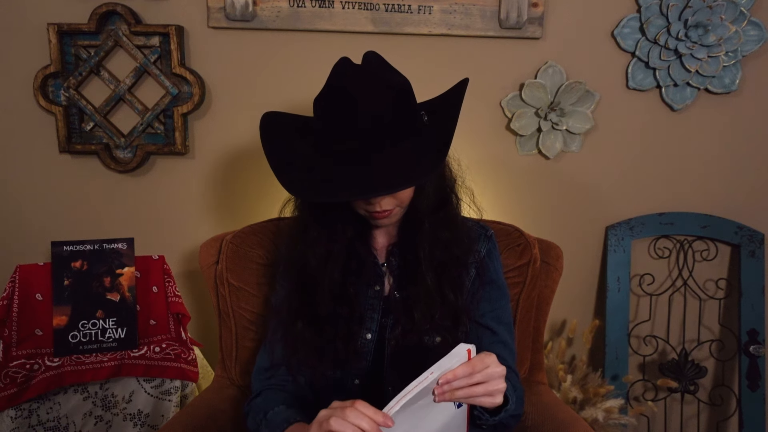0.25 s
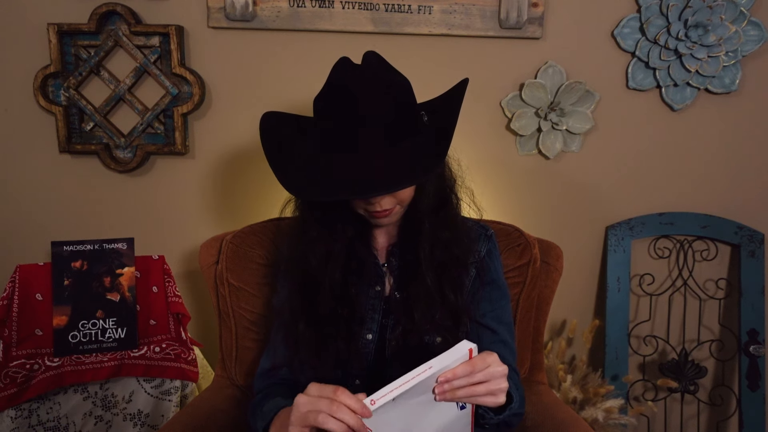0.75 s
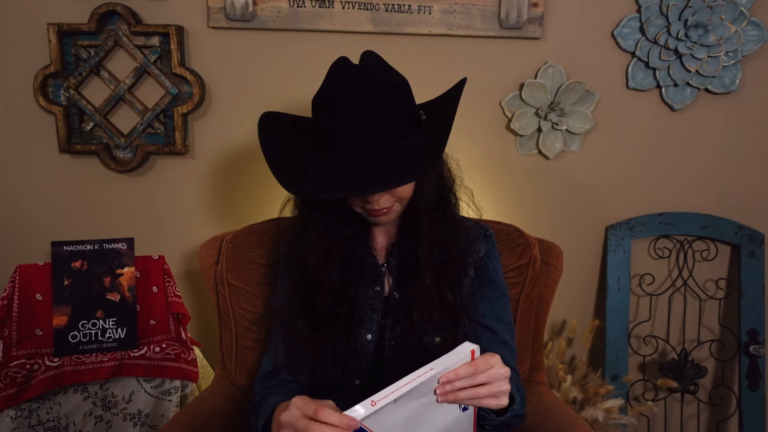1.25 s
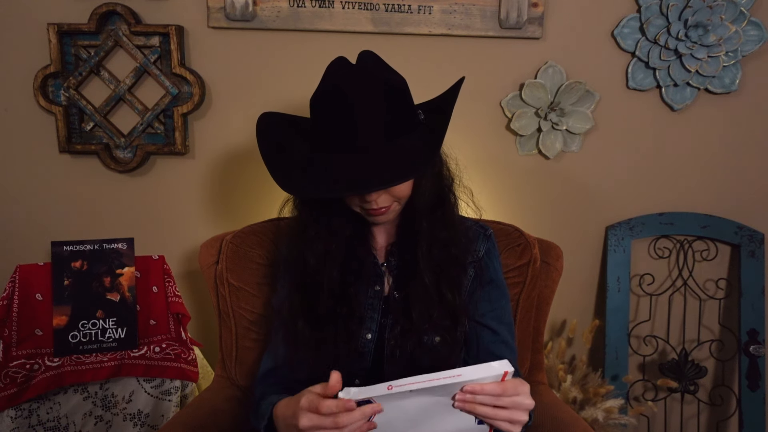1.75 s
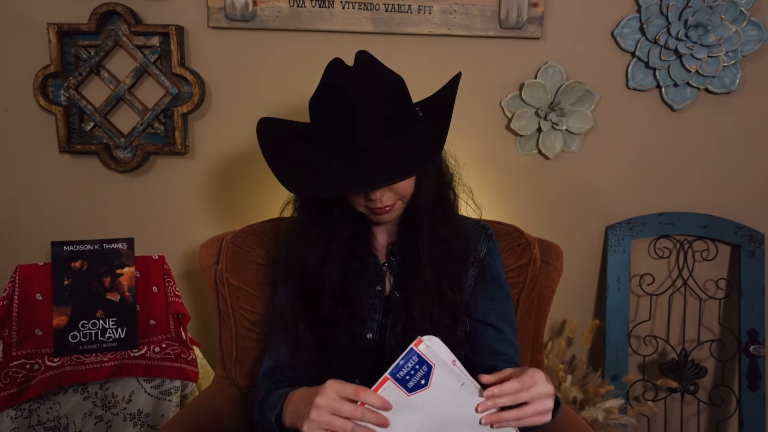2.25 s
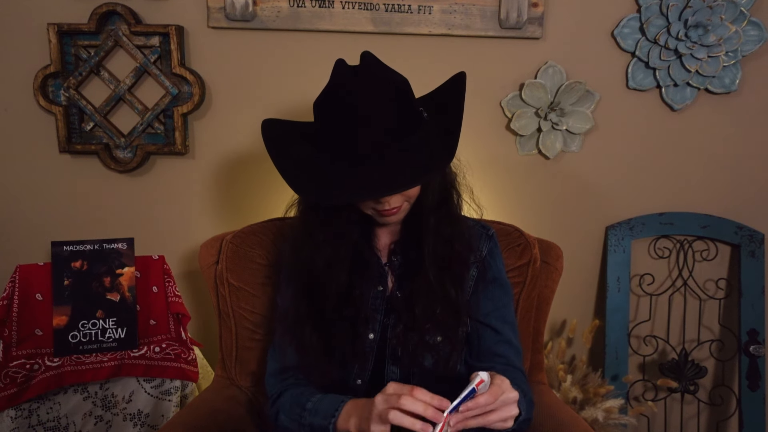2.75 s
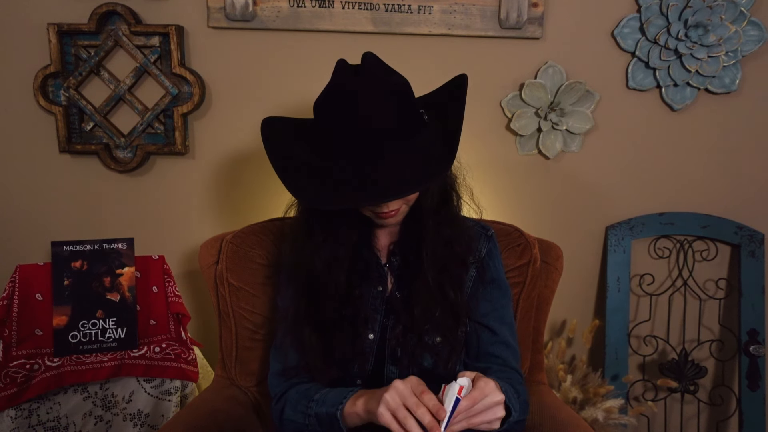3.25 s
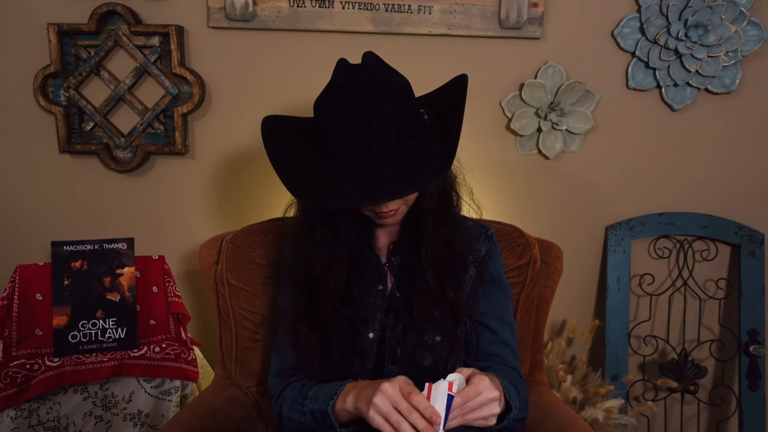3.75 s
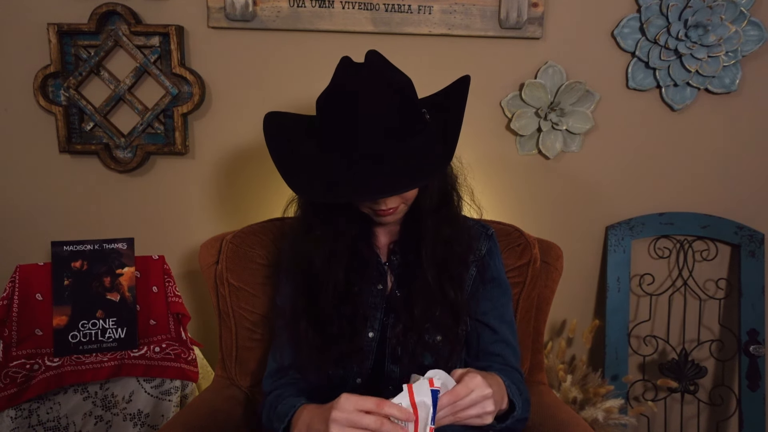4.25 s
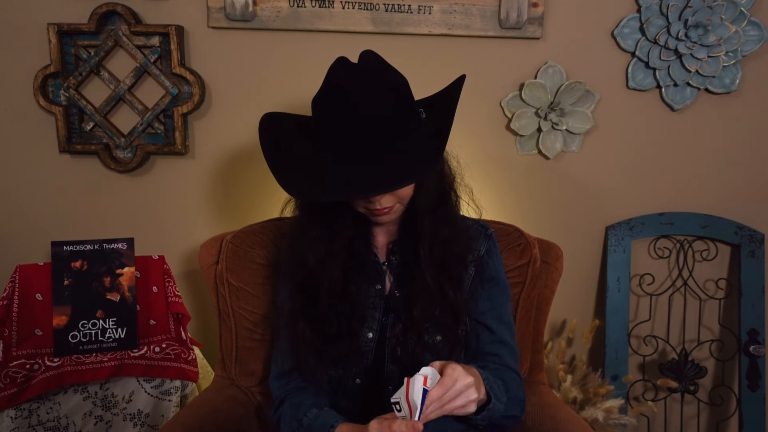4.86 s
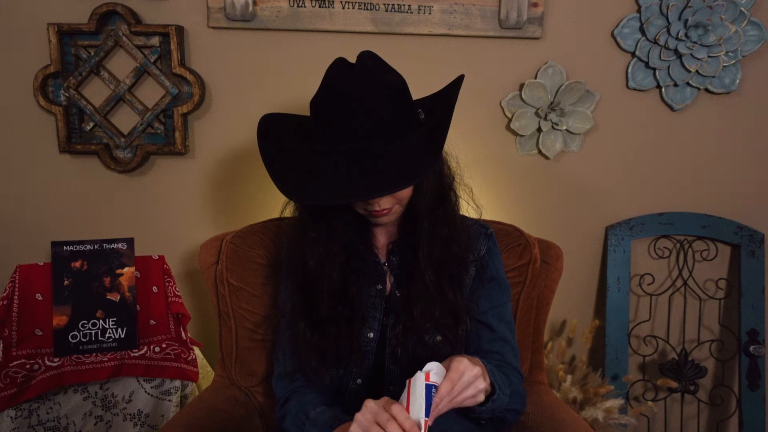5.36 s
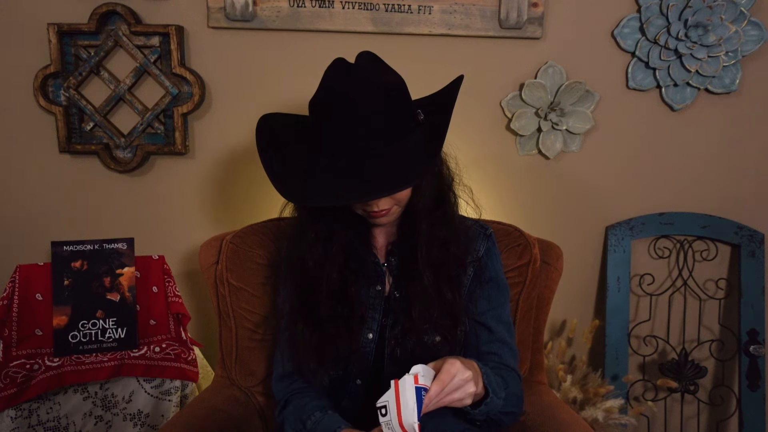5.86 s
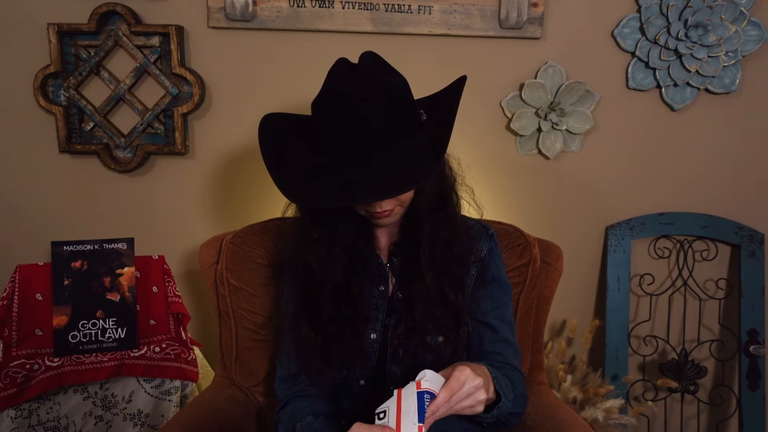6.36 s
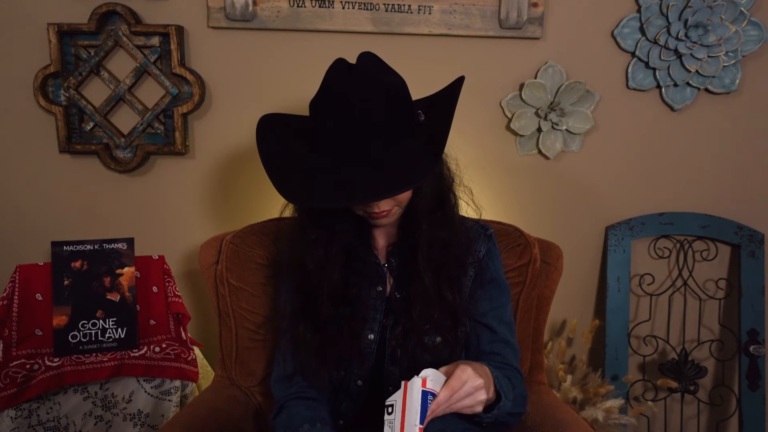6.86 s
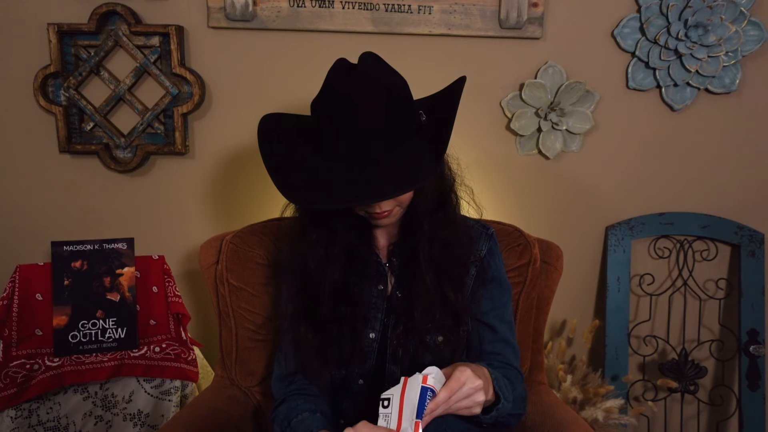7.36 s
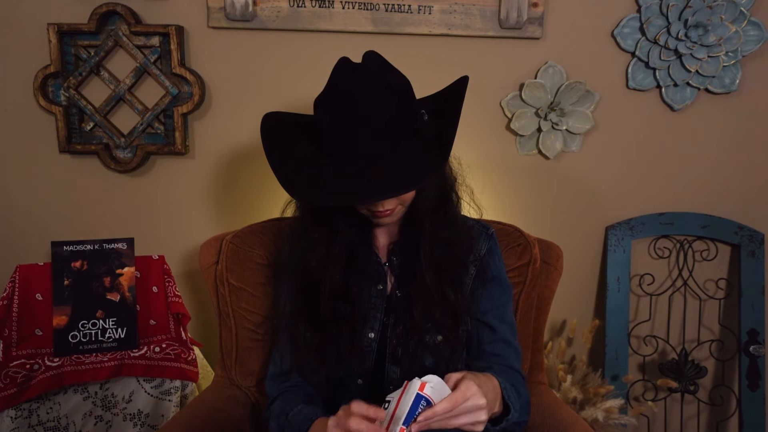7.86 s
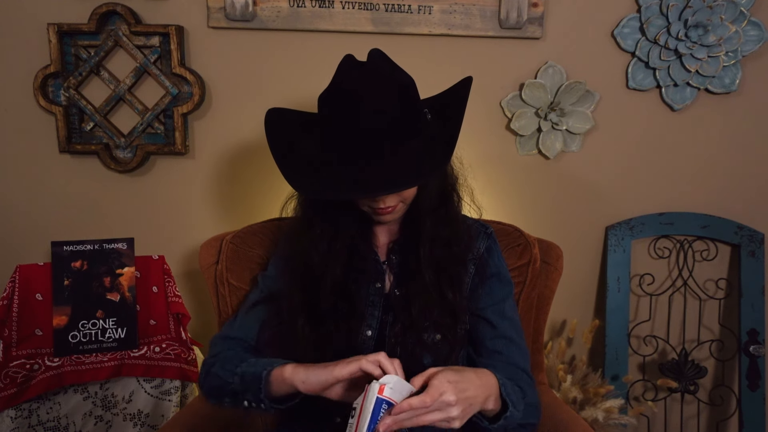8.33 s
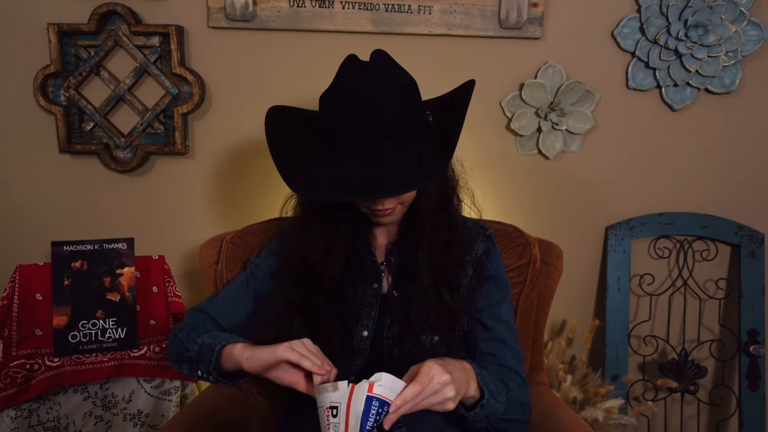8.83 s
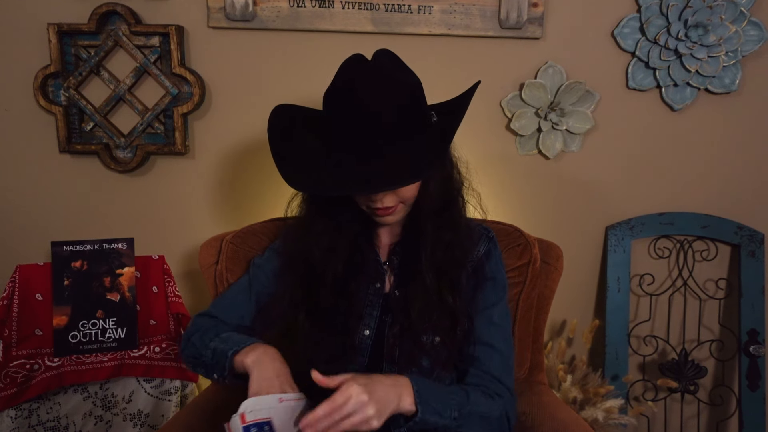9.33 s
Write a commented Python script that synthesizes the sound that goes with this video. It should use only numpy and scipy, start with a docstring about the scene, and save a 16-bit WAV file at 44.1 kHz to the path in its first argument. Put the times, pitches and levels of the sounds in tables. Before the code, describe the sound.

Hands tear open a stiff paper envelope close by, with irregular rustling, crinkling, sharp snaps and soft hollow thumps in a quiet room.

```python
"""A small furnished room, where hands tear and crumple a stiff paper envelope close by.
Fibres part with a grainy hiss, the sheet rustles, creases crunch and snap, and a finger slides along
the folded edge. Bent panels pop as they flip and sing when rubbed; the hollow packet thumps, and late
on its opened mouth rings under the fingers. Near walls answer each snap over a faint room hum."""
import sys
import numpy as np
from scipy import signal
from scipy.fft import rfft, irfft, next_fast_len
from scipy.io import wavfile
from scipy.ndimage import uniform_filter1d, map_coordinates

SR = 44100
rng = np.random.default_rng(int(sys.argv[2]) if len(sys.argv) > 2 else 0)


def store_pcm(level_fs):
    """Save levels as 16-bit WAV."""
    pcm = np.round(np.clip(level_fs, -1, 1) * 32767).astype(np.int16)
    wavfile.write(sys.argv[1], SR, np.atleast_2d(pcm).T)


N = 422916

# pulls and rubs of the hands: full_strength_s, climb_s, hold_s, rustle_db, crunch_over_rustle_db
STROKES = [(0.0, .01, 0.06, -55, -8), (0.081, .3, 0.022, -60.5, -14), (0.186, 0.029, 0.029, -47.5, -5),
           (0.275, 0.045, 0.0074, -52.5, -17), (0.598, 0.16, .001, -32.5, -22),
           (0.725, 0.17, 0.024, -45.5, -12.5), (0.818, 0.14, 0.062, -60, -9),
           (0.936, 0.026, 0.0011396, -46, 6), (1.074, 0.22, 0.052, -62.5, -18),
           (1.331, 0.0033, 0.11, -58.5, 1), (1.423, 0.0052, 0.075, -44, -5.5),
           (1.542, 0.029, 0.043, -44.5, -7.5), (1.63, 0.1342, 0.33, -51.5, -7.5),
           (1.994, 0.084, 0.089, -48.5, -12), (2.26, 0.1, 0.0011, -43.5, -18),
           (2.517, 0.38, 0.68, -59.5, -4), (3.254, 0.1, 0.076, -54.5, -9), (3.381, 0.057, 0.13, -49.5, -14),
           (3.67, 0.027, 0.027, -41, -17.5), (3.813, 0.21, 0.025, -46.5, -15), (3.97, 0.14, 0.13, -43, -8),
           (4.143, .008, 0.12, -44, 5.5), (4.228, 0.05, 0.034, -34.5, -1),
           (4.344, 0.077, 0.02, -41.5, -6.5), (4.415, 0.023, 0.066, -41, -12),
           (4.603, 0.088, 0.02463, -52.5, -1), (4.79, 0.083, 0.04, -48.5, -11),
           (4.988, 0.3, 0.016, -53, -24), (5.179, 0.034, 0.05, -60, -3.5),
           (5.239, 0.011, 0.0838, -46.5, -23), (5.329, 0.028, 0.17, -40.5, -5.5),
           (5.662, 0.058, 0.07, -47, -5), (5.873, 0.037, 0.11, -45, -12),
           (6.019, 0.036, 0.0007303, -33.5, -9), (6.146, 0.062, 0.1, -42.5, -6),
           (6.389, 0.12, 0.0014, -37.5, -7.5), (6.61, 0.066, 0.025, -47.5, -10.5),
           (6.806, 0.38, 0.13, -57.5, -8), (6.997, 0.044, 0.0011, -51, -6.5), (7.099, 0.046, .01, -59, -5),
           (7.205, 0.067, 0.07, -50.5, 3), (7.336, 0.14, 0.15, -63.5, 0), (7.515, 0.12, 0.184, -59.5, 4.5),
           (7.731, 0.035, 0.098, -54.5, 1), (7.86, 0.3, 0.13, -61, -2), (8.192, 0.0046, 0.027, -56.5, 0),
           (8.323, 0.11, .001, -43, 2.5), (8.46, 0.11, 0.031, -44.5, -11),
           (8.526, 0.055, 0.17, -57.5, 11.5), (8.742, 0.046, 0.24, -63.5, 10),
           (8.979, 0.038, 0.23, -59.5, 2.5), (9.307, 0.016, 0.019, -35, -14.5),
           (9.426, 0.64, 0.13, -60.5, -1.5), (9.58, 0.048, .02, -59, 10)]
# how far the fibre hiss rides above the rustle: time_s, offset_db
HISS_OVER_RUSTLE = [(0.0, 10), (.2, 2.5), (.6, 2), (1.0, -0.5), (3.0, -1.5), (3.3, 7.5), (3.5, -7.5),
                    (3.8, 4.5), (4.4, -7), (5.3, 5), (5.7, -1), (6.3, 6), (6.7, 1), (7.2, 6), (7.7, -1.5),
                    (8.0, 3), (8.35, -9.5), (8.6, 2.5), (9.3, -3.5), (9.59, 0.5)]
# the grit thins where paper slides or parts in single snaps: start_s, end_s, grit_share
SMOOTH_SPANS = [(0.383, .8, .15), (1.4, 1.6, .3), (3.931, 4.4, 0.55), (5.359, 6.95, 0.64),
                (8.424, 8.53, .3), (9.28, 9.4, .15)]
# creases and glue snapping: start_s, sheet_db, fibre_over_sheet_db
SNAPS = [(0.052, -52.5, 26.5), (0.179, -16, -1), (.225, -29, 2), (0.473, -40.5, 21), (0.636, -23.5, 10),
         (0.856, -52, -35), (.921, -4, -1), (1.313, -43, -9), (1.337, -26, -4.5), (1.548, -16.5, 1),
         (1.899, -30, -6.5), (2.233, -33.5, -2), (2.578, -40, -8), (2.685, -54, 22), (3.352, -37, 10),
         (3.372, -13.5, 20), (3.52, -31, -16.5), (3.666, -19.5, 12.5), (3.807, -19.5, 10), (3.944, -39, 16),
         (3.96, -38, 16), (3.984, -20, 10.5), (4.004, -24.5, 3), (4.0336, -23.5, 10.5), (4.056, -23, 5),
         (4.066, -25, 11.5), (4.075, -23.5, 7), (4.089, -31, 12), (4.1135, -33, 13), (4.145, -28, -23),
         (4.166, -29, -16.5), (4.18, -27, -15), (4.226, -26, -21), (4.243, -19.5, -19), (4.251, -15, -13),
         (4.262, -28.5, -26), (4.276, -13.5, -3), (4.297, -10, 1), (4.372, -21, -2), (4.429, -19.5, -8),
         (4.591, -16, -1.5), (4.616, -14.5, -5.5), (4.946, -35.5, 7), (5.001, -26.5, 2), (5.232, -32, 11),
         (5.295, -30, 14), (5.327, -26.5, -9), (5.646, -27, -11.5), (5.7, -36, -21.5), (5.866, -31, -29.5),
         (6.401, -12.5, -4), (6.548, -38.5, 25.5), (7.186, -41, 20), (7.213, -35, 18), (7.873, -37, -10),
         (8.4487, -15.5, -3), (8.4529, -15.5, 6), (8.456, -14, 3), (8.751, -34.5, -43.5), (8.845, -54, -39),
         (8.944, -39.5, -34.5), (9.561, -30.5, -10.5)]
# base level of the packet's flexing: time_s, level_db
FLEX_LEVEL = [(0.0, -84), (0.64, -82), (1.33, -75), (1.47, -69), (3.36, -67.5), (4.25, -62.5), (4.94, -70),
              (5.37, -81), (6.73, -86), (8.2, -68), (8.63, -56.5), (9.59, -75)]
# panels flipping over: start_s, level_db, pitch_hz
PANEL_POPS = [(.179, -21.5, 1210), (.921, -15.5, 854), (0.922, -20.5, 2220), (1.547, -21, 2520),
              (1.702, -38, 450), (2.293, -24, 647), (2.397, -51, 403), (2.424, -49, 474), (2.443, -46, 482),
              (3.372, -11.5, 1990), (4.277, -16.5, 1004), (4.364, -21.5, 1020), (5.786, -42.5, 596),
              (8.541, -36.5, 479), (8.751, -6.5, 640), (8.844, -24, 864)]
# a finger along the folded edge: time_s, level_db
SLIDE_LEVEL = [(0.39, -74.5), (0.418, -59), (0.5, -50), (0.548, -45), (0.588, -23.5), (0.632, -35.5),
               (0.67, -48.5), (0.705, -38.5), (0.761, -43), (0.772, -74)]
# rubbed panels singing: middle_s, half_length_s, pitch_hz, level_db
PANEL_RINGS = [(1.434, 0.0082, 2340, -28.5), (1.446, 0.003, 2320, -29.5), (1.471, .012, 2300, -34.5),
               (4.337, 0.011, 1010, -38), (6.208, 0.097, 3060, -50), (6.38, 0.025, 3940, -30),
               (8.252, 0.011, 4640, -43), (8.26, 0.014, 2380, -38), (8.293, 0.0038, 4300, -34),
               (8.325, 0.0068, 2700, -30), (8.355, 0.008, 5160, -31.5), (9.314, 0.0037, 2300, -30.5),
               (9.331, .006, 3430, -30)]
# fingers knocking the packet: peak_s, level_db, nominal_pitch_hz
THUMPS = [(1.553, -37, 162), (1.589, -35, 151), (2.067, -41.5, 124), (2.189, -44, 114), (2.239, -36, 130),
          (2.292, -27.5, 120), (2.582, -39, 101), (3.527, -36, 111.5), (3.669, -29, 126), (3.865, -36, 110),
          (4.623, -31.5, 106), (5.011, -38, 135), (5.285, -35.5, 103), (5.34, -37, 142), (5.649, -46, 125),
          (5.704, -37, 140), (5.871, -33.5, 108), (6.404, -31.5, 128), (7.234, -36.5, 111),
          (8.458, -18.5, 118), (8.498, -25.5, 127), (8.571, -31, 102), (8.757, -29.5, 132),
          (9.355, -26, 172)]
# nail scrapes and quick rips: middle_s, half_length_s, fibre_db, sheet_db, crease_db
RASPS = [(4.196, 0.012, -32.5, -35.5, -35), (5.903, 0.0097, -44.5, -41, -42.5),
         (6.389, 0.01, -24, -30, -38.5), (7.233, 0.004, -36, -66, -50), (8.019, 0.01, -51, -59, -66),
         (8.359, 0.014, -49, -31.5, -52), (8.434, 0.004, -38, -32, -40), (8.495, 0.005, -42, -34, -27)]

# tone colours: frequency_hz, level_db
FIBRE_EQ = [(2500, -27.5), (4800, -6), (6300, 1.5), (8100, 3.5), (10000, -4.5), (12900, -1), (15500, 1),
            (18000, -10.5)]  # airy hiss of parting fibres
SHEET_EQ = [(600, -67), (1150, 0), (1700, 2), (2300, 0.5), (3300, -2.5), (4200, -5.5), (5500, -12.5),
            (8000, -55.5)]  # midrange rustle of the sheet
CREASE_EQ = [(130, -40.5), (280, 4.5), (420, 7), (650, 1.5), (900, 5), (1300, -2.5), (2600, -67.5)]  # low-mid crunch of creases
BUCKLE_EQ = [(130, -31), (330, -1.5), (700, -2), (1200, -8), (2300, -14), (3600, -49.5)]  # a crease giving way at once
FLEX_EQ = [(25, -52.5), (50, 3.5), (80, 6), (120, -12.5), (200, -1), (320, -17.5), (600, -52.5)]  # rumble of the flexing packet
HUM_EQ = [(30, -67), (60, -4), (120, 11.5), (250, -25), (370, -15.5), (420, 1), (480, -23.5), (800, -22.5),
          (1800, -12), (5000, -29), (16000, -26)]  # room tone
FOLD_EQ = [(1500, -26.5), (2050, -8.5), (2300, -1), (2600, -16.5), (3400, -22.5), (4300, -7), (5300, -9.5),
           (7000, -43.5)]  # ring of the folded edge
MOUTH_EQ = [(1200, -35), (1600, -5.5), (1720, -9.5), (1850, -26), (2500, -39.5)]  # ring of the opened mouth

# early echoes off near walls: delay_s, level_db
WALL_ECHOES = [(0.01, -26), (0.012, -21.5), (0.0152, -23)]
# decay of the room's tail: frequency_hz, t60_s
ROOM_DECAY = [(150, 0.27), (1000, 0.29), (8000, 0.2)]

TIME = np.arange(N) / SR


def amp(db):
    return 10 ** (np.asarray(db) / 20)


def unit_rms(x):
    return x / np.sqrt(np.mean(x ** 2) + 1e-20)


def eq_at(points, hz):
    """Read a curve on a log frequency axis."""
    knots_hz, values = np.transpose(points)
    return np.interp(np.log(hz + 1), np.log(knots_hz + 1), values)


def fader(points, outside=None):
    """A level ride, one value a sample."""
    return np.interp(TIME, *np.transpose(points), left=outside, right=outside)


def wobble(rate_hz):
    """A smooth random drift."""
    knots = rng.standard_normal(int(N * rate_hz / SR) + 4)
    return map_coordinates(knots, [TIME * rate_hz])


def resonate(x, eq, size=4096):
    """Play x through a tone colour, as a minimum-phase impulse response of peak 1."""
    cepstrum = irfft(np.log(amp(eq_at(eq, np.fft.rfftfreq(size, 1 / SR)))))
    cepstrum[1:size // 2] *= 2
    cepstrum[size // 2 + 1:] = 0
    response = irfft(np.exp(rfft(cepstrum)))[:size // 2]
    return signal.fftconvolve(x, response / np.abs(response).max())[:N]


def noise_bed(eq):
    return unit_rms(resonate(rng.standard_normal(N), eq))


def room_hum():
    """The faint steady noise of the room."""
    return amp(-63) * noise_bed(HUM_EQ)


def hand_strokes(sag_db_per_s=17.5, release_db_per_s=190.5, idle_db=-76):
    """Hiss, rustle and crunch gains: each stroke climbs, tires and lets go; the strongest leads."""
    t = np.arange(0, N / SR, 1 / 500)
    full_s, climb_s, hold_s, rustle_db, crunch_db = np.transpose(STROKES)[..., None]
    climb_left = np.maximum(full_s - t, 0) / np.abs(climb_s)
    after_s = np.maximum(t - full_s, 0)
    freed_s = np.maximum(after_s - hold_s, 0)
    attack_db = 20 * climb_left * (1 + 0.23 * climb_left)
    release_db = release_db_per_s * freed_s * (1 + freed_s / 0.15)  # the fade gathers speed
    stroke_db = rustle_db - attack_db - sag_db_per_s * after_s - release_db
    sheet_db = np.interp(TIME, t, np.maximum(stroke_db.max(0), idle_db))
    crease_db = np.interp(TIME, t, np.maximum((stroke_db + crunch_db).max(0), idle_db))
    return amp(sheet_db + fader(HISS_OVER_RUSTLE)), amp(sheet_db), amp(crease_db)


def grains(rate_hz, spread_db, clump):
    """Sparse random breaks, most small and a few large, coming in clumps."""
    hits = rng.random(N) < rate_hz * np.exp(clump * wobble(25)) / SR
    size = np.minimum(rng.exponential(size=N), 2.4)
    return unit_rms(hits * amp(spread_db * size) * rng.standard_normal(N))


def bend(x, depth_db=2.8):
    """Worked paper bends, so its resonances wander while the loudness holds."""
    spectrum = signal.stft(x, nperseg=256)[2]
    drift = uniform_filter1d(rng.standard_normal(spectrum.shape), size=5, axis=0)
    drift = uniform_filter1d(drift, size=30, axis=1)
    gain = amp(depth_db * unit_rms(drift))
    power = np.mean(np.abs(spectrum) ** 2, axis=1, keepdims=True)
    gain /= np.sqrt(np.sum(power * gain ** 2, axis=0) / power.sum())
    return signal.istft(spectrum * gain, nperseg=256)[1][:N]


def friction(eq, breaks, graininess):
    """Fluttering rub noise and tiny breaks drive one part of the paper."""
    grit = np.ones(N)
    for start_s, end_s, share in SMOOTH_SPANS:
        grit[(TIME > start_s) & (TIME < end_s)] = share
    rub = unit_rms(amp(3 * grit * wobble(45)) * rng.standard_normal(N))
    grain_mix = graininess * grit
    drive = (rub + grain_mix * breaks) / np.sqrt(1 + grain_mix ** 2)
    return unit_rms(bend(resonate(drive, eq)))


def paper_rustle(hiss, rustle, crunch):
    """The same breaks shake fibres and sheet; creases buckle more seldom."""
    breaks = grains(rate_hz=800, spread_db=8, clump=0.98)
    buckles = grains(rate_hz=110, spread_db=9, clump=1)
    fibre = hiss * friction(FIBRE_EQ, breaks, graininess=0.75)
    sheet = rustle * friction(SHEET_EQ, breaks + 0.17 * buckles, graininess=0.93)
    crease = crunch * friction(CREASE_EQ, buckles, graininess=0.93)
    return fibre + sheet + crease


def packet_flex(crunch):
    """The packet flexes with an uneven rumble that swells with every crunch."""
    rumble = unit_rms(resonate(amp(wobble(9.8)) * rng.standard_normal(N), FLEX_EQ))
    return (amp(fader(FLEX_LEVEL)) + amp(-9) * crunch) * rumble


def snap_layer(eq, levels_db, t60_s):
    """Each snap is one sharp break with a short ragged trail."""
    force, t = np.zeros(N + SR), np.arange(800) / SR
    for (start_s, *_), db in zip(SNAPS, levels_db):
        burst = amp(-60 * t / t60_s) * rng.standard_normal(len(t))
        burst /= np.linalg.norm(burst)
        burst[0] = 0.57  # the leading click
        force[round(start_s * SR):][:len(t)] += amp(db) * burst
    return resonate(force[:N], eq)


def snaps():
    """Creases and glue crack in three layers; the duller a snap, the more it buckles a crease."""
    _, sheet_db, bright_db = np.transpose(SNAPS)
    fibre = snap_layer(FIBRE_EQ, sheet_db + bright_db, t60_s=0.005)
    sheet = snap_layer(SHEET_EQ, sheet_db, t60_s=0.014)
    crease = snap_layer(BUCKLE_EQ, sheet_db - 14.5 - 0.97 * bright_db, t60_s=0.024)
    return fibre + sheet + crease


def panel_pops(t60_cycles=16):
    """A panel flips over and rings for a few cycles: a hollow pop."""
    out, t = np.zeros(N + SR), np.arange(SR // 10) / SR
    for start_s, db, hz in PANEL_POPS:
        decay = amp(db - 60 * t * hz / t60_cycles)
        out[round(start_s * SR):][:len(t)] -= decay * np.sin(2 * np.pi * hz * t)
    return out[:N]


def finger_slide():
    """Smooth friction rings in the two resonances of the folded edge."""
    return amp(fader(SLIDE_LEVEL, outside=-120)) * noise_bed(FOLD_EQ)


def panel_rings(q=5.9):
    """A bent panel filters the rubbing and sings at its own pitch."""
    out = np.zeros(N + SR)
    for middle_s, half_s, hz, db in PANEL_RINGS:
        t = np.arange(-3 * half_s, 3 * half_s, 1 / SR)[:SR // 2]
        tone = signal.lfilter(*signal.iirpeak(hz, q, SR), rng.standard_normal(len(t)))
        swell = amp(db) * np.exp(-(t / half_s) ** 2)
        out[round((middle_s + t[0]) * SR):][:len(t)] += swell * unit_rms(tone)
    return out[:N]


def packet_thumps(rise_s=0.005):
    """Under a finger, the air in the packet gives a low, uneven knock and the stiff card rattles."""
    knocks, taps = np.zeros((2, N + SR))
    t = np.arange(SR // 4) / SR
    for peak_s, db, hz in THUMPS:
        start = round((peak_s - rise_s) * SR)
        waver = 0.32 * unit_rms(uniform_filter1d(rng.standard_normal(len(t)), size=300))
        pitch = hz * (0.75 + 0.67 * np.exp(-t / 0.0067)) * (1 + waver)  # sags as the walls relax
        punch = t / rise_s * np.exp(1 - t / rise_s)
        tail = 0.46 * amp(-60 * t / 0.19) * (1 - np.exp(-t / rise_s))
        knocks[start:][:len(t)] += amp(db) * (punch + tail) * np.sin(2 * np.pi * np.cumsum(pitch) / SR)
        taps[start:][:len(t)] += amp(db - 60 * t / 0.12) * rng.standard_normal(len(t))
    return knocks[:N] + 0.042 * resonate(taps, CREASE_EQ)


def rasps():
    """A nail or a quick rip adds a bell-shaped swell to the hiss, rustle and crunch gains."""
    gains = np.zeros((3, N))
    for middle_s, half_s, *levels_db in RASPS:
        gains += np.outer(amp(levels_db), np.exp(-((TIME - middle_s) / half_s) ** 2))
    return gains


def mouth_ring(rustle, open_s=6.68, shut_s=9.27, fade_s=0.11):
    """While the mouth of the envelope gapes, rubs ring in it."""
    gape = np.clip(np.minimum(TIME - open_s, shut_s - TIME) / fade_s, 0, 1)
    return amp(-2.5) * gape * rustle * noise_bed(MOUTH_EQ)


def room_echo(x, tail_db=-17, predelay_s=0.006):
    """Near walls slap back over a short tail whose treble dies sooner."""
    hz, t, spectrum = signal.stft(rng.standard_normal(SR // 2), SR, nperseg=256)
    decay = amp(-60 * t / eq_at(ROOM_DECAY, hz)[:, None])
    tail = signal.istft(spectrum * decay, SR, nperseg=256)[1]
    response = np.pad(amp(tail_db) * tail / np.linalg.norm(tail), (round(predelay_s * SR), 0))
    for delay_s, db in WALL_ECHOES:
        response[round(delay_s * SR)] += amp(db)
    return signal.fftconvolve(x, response)[:N]


def scene():
    """The envelope up front, its echo and the hum behind, in mono."""
    hiss, rustle, crunch = hand_strokes()
    hiss_rasp, rustle_rasp, crunch_rasp = rasps()
    near = paper_rustle(hiss + hiss_rasp, rustle + rustle_rasp, crunch + crunch_rasp)
    near += packet_flex(crunch) + snaps() + panel_pops() + finger_slide()
    near += panel_rings() + packet_thumps() + mouth_ring(rustle)
    return (near + room_echo(near) + room_hum())[None]


def record(dry, low_cut_hz=32, shelf_hz=15900, top_hz=17130):
    """The deepest bass is thinned; the highest hiss is dulled above 15.9 kHz and ends at 17.1 kHz."""
    size = next_fast_len(N + SR // 2)
    hz = np.fft.rfftfreq(size, 1 / SR)
    low_cut = (1j * hz / (low_cut_hz + 1j * hz)) ** 5
    shelf = amp(np.interp(hz, [shelf_hz - 150, shelf_hz + 150], [0, -40]))
    return irfft(rfft(dry, size) * low_cut * shelf * (hz < top_hz), size)[..., :N]


dry = scene()
out = record(dry)
store_pcm(out)
```